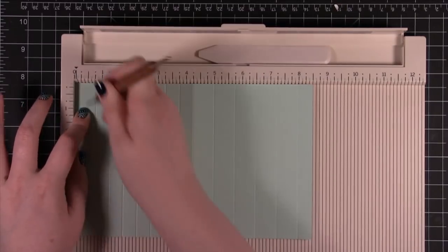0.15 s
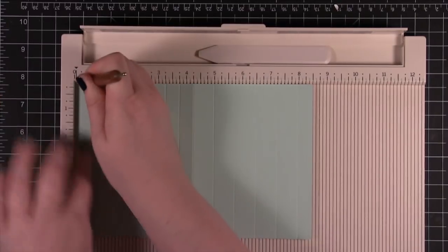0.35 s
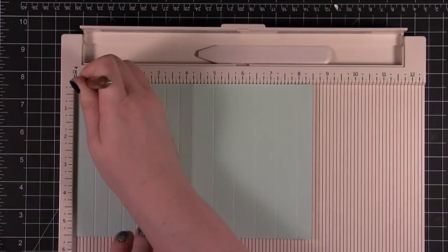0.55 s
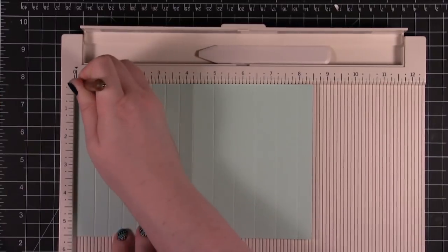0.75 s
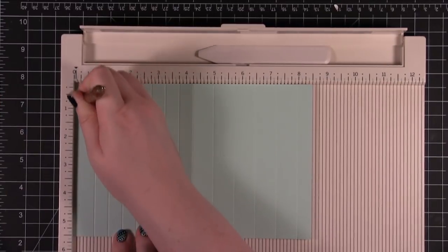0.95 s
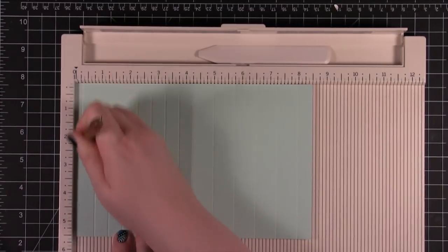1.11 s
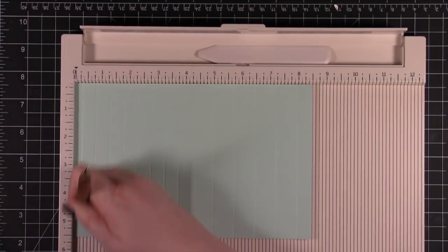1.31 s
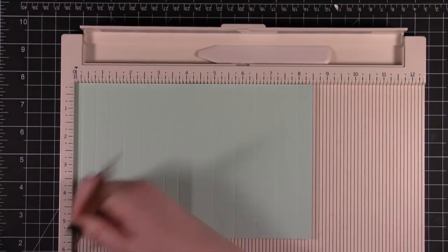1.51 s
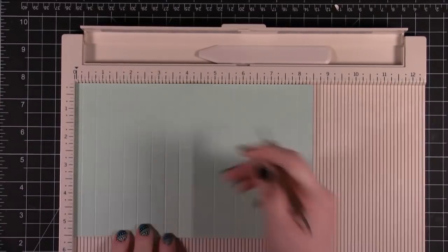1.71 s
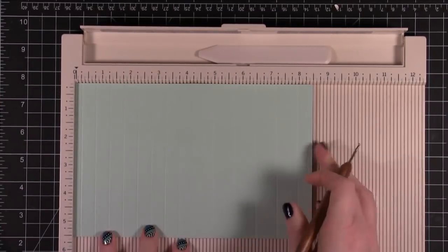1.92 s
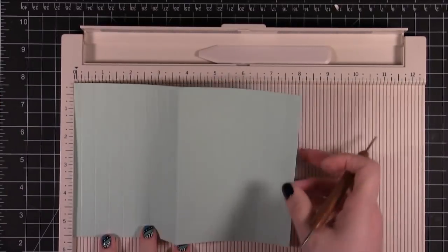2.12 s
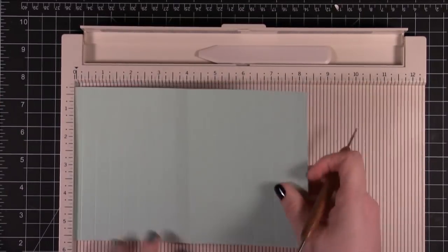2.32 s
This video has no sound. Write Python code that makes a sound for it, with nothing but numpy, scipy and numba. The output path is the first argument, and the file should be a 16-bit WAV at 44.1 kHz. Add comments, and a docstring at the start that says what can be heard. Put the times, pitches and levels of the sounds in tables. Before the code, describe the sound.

Stylus scoring card with a short rasp, ending in a sharp plastic click.

```python
"""A stylus scores cardstock on a plastic scoring board, at a desk in a small room.
Drawn down a groove, the tip crushes fibres (hiss) and stick-slips (rasp), then knocks on the board.
Before the stroke a hand slides over the sheet; after it fingers brush and lift the card,
which buckles with two dull pops. Ventilation noise and faint mains hum lie underneath."""
import sys
import numpy as np
from scipy import signal
from scipy.fft import rfft, irfft, next_fast_len
from scipy.io import wavfile
from numba import njit

SR = 44100
rng = np.random.default_rng(int(sys.argv[2]) if len(sys.argv) > 2 else 0)


def generate_wav(signal):
    """Clip the signal to [-1, 1] and save it as 16-bit WAV at the path in sys.argv[1]."""
    frames = np.transpose(np.atleast_2d(signal))
    scaled = np.clip(frames, -1, 1) * 32767
    pcm = np.round(scaled).astype(np.int16)
    wavfile.write(sys.argv[1], SR, pcm)


N = 103811
T = np.arange(N) / SR


def stylus():
    """The tip crushes fibres; its stick-slip shakes the board, whose drone grows towards the edge."""
    # stroke envelopes: time_s, hiss_db, rasp_db, drone_db
    stroke = [(.88, -84, -90, -80), (.95, -59, -56, -76), (1.03, -50, -66.5, -66),
              (1.11, -45.5, -50.5, -54), (1.18, -40.5, -44, -55.5), (1.25, -41, -36, -52.5),
              (1.32, -39, -32, -52), (1.35, -43, -35, -38), (1.385, -38.5, -41, -39.5),
              (1.418, -42.5, -40.5, -51), (1.43, -57, -54, -62)]
    # fibre and groove spectra: freq_hz, level_db
    fibre_colour = [(300, 0), (1500, -2), (3300, 0.5), (5000, -0.5), (7500, 0), (12000, -5), (16000, -13.5)]
    groove_colour = [(60, -22), (170, -8.5), (280, -10), (350, -4), (520, 2.5), (800, -1.5), (1300, -5.5),
                     (1800, -10), (2600, -21), (6000, -27)]
    # board resonances under the tip: centre_hz, relative_width, level_db
    groove_peaks = [(362, 0.17, -13.5), (469, 0.11, -6), (1002.6, 0.033, -6.5), (1748, 0.023, -15.5)]
    sag_from_s, sag_per_s = 1.3, 0.56
    drone_hz, waver, flutter_db = 232.4, 0.024, 4.5
    hiss = unit(colour(grains(per_s=13000, spread_db=0), fibre_colour))
    slips = grains(per_s=5000, spread_db=3)
    sag = 1 - sag_per_s * np.clip(T - sag_from_s, 0, .5)  # resonances fall near the edge
    peaks = sum(amp(db) * unit(band(slips, hz * sag, width)) for hz, width, db in groove_peaks)
    rasp = unit(unit(colour(slips, groove_colour)) + peaks)
    pitch_hz = drone_hz * (1 + waver * wander(rate_hz=33))
    flutter = amp(flutter_db * wander(rate_hz=25))
    drone = unit(np.sin(2 * np.pi * np.cumsum(pitch_hz) / SR) * flutter)
    return hiss * curve(stroke, 1) + rasp * curve(stroke, 2) + drone * curve(stroke, 3)


def knocks(size=16000):
    """The stylus runs off the card and hits the board: crack, ringing plastic, short rattle."""
    # impacts: start_s, level_db
    hits = [(1.4243, 0.5), (1.4438, -22)]
    # board modes: freq_hz, level_db, t60_s
    board_modes = [(133.5, -35.5, 0.23), (232.6, -27.5, 0.157), (320, -29.5, 0.14), (400, -17, 0.1),
                   (485, -12.5, 0.074), (574, -15.5, 0.072), (763, -11, 0.058), (940, -20, 0.067),
                   (1268, -20, 0.11), (1463, -31.5, 0.13), (1765, -31, 0.1), (2074, -23, 0.062),
                   (2234, -20.5, 0.06), (2540, -30, .1)]
    # crack and rattle spectra: freq_hz, level_db
    crack_colour = [(100, -27), (260, -24), (420, -13), (900, 3), (1600, 3), (3000, 0.5), (4600, 0.5),
                    (6000, -9.5), (9500, -11.5), (11000, -21), (12700, -13.5), (16000, -25)]
    rattle_colour = [(40, -7), (170, -23), (270, -8), (340, 6.5), (750, 3.5), (1100, -2), (2600, -9),
                     (4600, -3), (6200, -13), (10000, -18.5), (16000, -26)]
    rise_s = 0.00055
    attack = 1 - np.exp(-T[:size] / rise_s)
    plastic = ring(board_modes, push_s=.00008, size=size, radiate_hz=153)
    out = np.zeros(N)
    for start_s, db in hits:
        crack = amp(-14) * burst(crack_colour, size, t60_s=0.039) * attack
        rattle = amp(-19.5) * burst(rattle_colour, size, t60_s=0.21)
        add(out, start_s, amp(db) * (plastic + crack + rattle))
    return out


def hand():
    """Skin slides on paper: hiss shaped by the gap under the hand, plus a soft board rustle."""
    # slide envelope and gap resonance: time_s, level_db, gap_hz
    slide = [(0, -40.5, 3730), (.05, -40.5, 3580), (.12, -40, 3670), (.22, -39.5, 3340), (.28, -42.5, 3050),
             (.325, -49, 3550), (.355, -44.5, 4160), (.42, -46, 4460), (.445, -49.5, 4550),
             (.465, -63, 4800), (.48, -56, 5200), (.495, -46.5, 5700), (.565, -47.5, 5700),
             (.62, -63, 5400), (.7, -70, 5330)]
    # skin friction and board rustle spectra: freq_hz, level_db
    skin_colour = [(300, -3), (1500, 6), (3500, -3.5), (6500, 1), (9000, 0.5), (12000, 0), (16000, -6)]
    rustle_colour = [(60, -8), (200, -9), (330, -5), (480, 6), (700, -5), (1200, -4), (2000, -9.5),
                     (3000, -34), (6000, -19)]
    times_s, _, resonances_hz = np.array(slide).T
    gap_hz = np.interp(T, times_s, resonances_hz)
    skin = noise(skin_colour)
    hiss = unit(highpass(skin, gap_hz, width=0.57))
    gap_ring = amp(-22) * unit(band(skin, gap_hz, width=0.14))
    rustle = amp(-11) * noise(rustle_colour)
    return (hiss + gap_ring + rustle) * curve(slide)


def fingers(size=4000):
    """Fingers, nails and tip touch the card: soft taps, ticks, a tiny squeak, short brushes."""
    # soft taps: start_s, level_db, push_s
    taps = [(.2235, -27, 0.001), (.2545, -32, 0.00035), (.2575, -33.5, 0.00097), (.261, -37.5, 0.00036),
            (.416, -27.5, 0.0015), (.428, -38.5, 0.00068), (1.677, -39.5, 0.00013), (1.989, -42, 0.00055),
            (2.02, -40, 0.00038), (2.149, -41, 0.00041), (2.256, -41, 0.00037)]
    # board modes damped by card and hand: freq_hz, level_db, t60_s
    damped_modes = [(374, -0.5, 0.021), (450, 0, 0.049), (540.7, 0.5, 0.11), (787, -3, 0.045),
                    (1020, -3, 0.048), (1304, -5.5, 0.06)]
    # nail and tip ticks: start_s, level_db, t60_s
    ticks = [(.2548, -35, 0.017), (1.7945, -34, 0.011), (2.0386, -33, 0.017), (2.2567, -32.5, 0.014)]
    # tick spectrum: freq_hz, level_db
    tick_colour = [(200, -14), (800, -2), (1600, 0), (3200, 5), (5500, 0), (9000, -10), (16000, -8)]
    # finger brushes: peak_s, half_length_s, level_db, centre_hz, relative_width, glide_oct_per_s
    brushes = [(.005, 0.016, -45.5, 900, 1.05, -8), (1.585, 0.013, -55.5, 5000, 1.9, 11),
               (1.806, 0.0097, -49.5, 7000, 2.4, -5), (1.876, .06, -57, 4000, 4.2, 3),
               (2.034, 0.036, -43, 1210, 2.35, 4), (2.036, 0.013, -41.5, 4240, 1.5, -3),
               (2.123, 0.026, -40.5, 6000, 0.99, 5), (2.148, 0.02, -41.5, 3070, 0.51, 0),
               (2.149, 0.023, -41, 1330, 0.87, -4), (2.2, .018, -36.5, 1210, 0.5, -3),
               (2.212, 0.05, -55.5, 5550, 1.3, 8), (2.262, .011, -38.5, 1610, 2.2, -5),
               (2.345, 0.049, -34, 1110, 2.8, 7)]
    out, friction = np.zeros(N), grains(per_s=9000, spread_db=3)
    for start_s, db, push_s in taps:
        add(out, start_s, amp(db) * ring(damped_modes, push_s, size, radiate_hz=223))
    for start_s, db, t60_s in ticks:
        add(out, start_s, amp(db) * burst(tick_colour, size, t60_s))
    for hz, width_hz, db in [(6050, 290, -52), (9740, 500, -50.5)]:
        squeak = unit(shape(friction, lambda f: np.exp(-((f - hz) / width_hz) ** 2)))
        out += amp(db) * swell(peak_s=1.69, half_s=0.0026) * squeak
    for peak_s, half_s, db, hz, width, glide in brushes:
        near = np.abs(T - peak_s) < 4 * half_s
        touch = swell(peak_s, half_s)[near]
        octaves = glide * np.clip(T[near] - peak_s, -2 * half_s, 2 * half_s)
        rub = touch * band(rng.permutation(friction[near]), hz * 2 ** octaves, width)
        out[near] += amp(db) * rub * np.sqrt(np.sum(touch ** 2) / np.sum(rub ** 2))
    return out


def sheet(size=8000):
    """The lifted card snaps through in quick steps, each ringing the sheet and crackling."""
    # buckling steps: start_s, ring_db, push_s, crackle_db
    pops = [(2.2735, -15, 0.00078, -34), (2.2793, -6, 0.00039, -28), (2.283, -11.5, 0.00032, -42),
            (2.2885, -14, 0.000084, -36.5), (2.301, -22, 0.00025, -34.5), (2.322, -19, 0.00011, -26.5),
            (2.327, -19.5, 0.00025, -43)]
    # sheet modes: freq_hz, level_db, t60_s
    sheet_modes = [(387.5, -11.5, 0.04), (527, -13.5, 0.078), (670, -13.5, 0.14), (817, -7.5, 0.038),
                   (982, -5, 0.069), (1198, 1, 0.058), (1286, -0.5, 0.027), (1457, 0.5, 0.022),
                   (1750, -11, 0.047), (2000, -10, 0.027), (2640, -15.5, 0.048)]
    # crackle spectrum: freq_hz, level_db
    crackle_colour = [(60, -18), (250, -3), (1000, 7.5), (2500, 1), (5000, -3), (8500, -5.5), (12000, -14),
                      (16000, -22)]
    out = np.zeros(N)
    for start_s, ring_db, push_s, crackle_db in pops:
        pop = amp(ring_db) * ring(sheet_modes, push_s, size, radiate_hz=410)
        crackle = amp(crackle_db) * burst(crackle_colour, size, t60_s=0.053)
        add(out, start_s, pop + crackle)
    return out


def room(x, size=22000):
    """Adds desk reflections and a short room tail, wider in the treble."""
    # reflection spectra (all, side only, early mid only): freq_hz, gain_db
    room_colour = [(60, -1), (200, 4), (500, -0.5), (1500, 4.5), (4500, -4), (8000, -5), (16000, -15)]
    side_colour = [(100, 0), (400, -6.5), (1100, -7.5), (2500, -1.5), (6000, 2.5), (14000, -2)]
    early_mid_colour = [(200, -7.5), (800, -7.5), (2000, -0.5), (6000, 0)]

    def echoes(db, t60_s, build_s):
        """Scatter that builds up and decays, as mid and side."""
        build = 1 - np.exp(-(T[:size] / build_s) ** 2)
        tail = rng.standard_normal((2, size)) * fade(t60_s, size) * build
        return colour(amp(db) * tail / np.sqrt(np.sum(tail ** 2) / 2), room_colour)

    early = echoes(db=-4.5, t60_s=0.028, build_s=0.0029)
    late = echoes(db=-11, t60_s=0.4, build_s=0.0095)
    mid = colour(early[0], early_mid_colour) + late[0]
    side = colour(early[1] + late[1], side_colour)
    response = np.array([mid + side, mid - side]) / np.sqrt(2)
    return x + signal.fftconvolve(x, response[:, :size - 1000], axes=1)[:, :N]


def air():
    """Steady ventilation noise and faint mains hum."""
    # ventilation spectrum: freq_hz, level_db
    vent_colour = [(20, -30), (55, 0), (85, -7), (120, 2), (170, -5), (300, -4), (450, 2), (650, -4.5),
                   (1100, -7), (2000, -10), (4500, -15.5), (10000, -20.5), (16000, -28)]
    hum_hz = 119.8
    side = 0.66 * noise(vent_colour)
    mid = noise(vent_colour)
    hum = np.sqrt(2) * np.sin(2 * np.pi * hum_hz * T)
    return amp(-53) * np.array([mid + side, mid - side]) + amp(-67) * hum


def ring(modes, push_s, size, radiate_hz):
    """Modes of alternating sign struck by a push (longer is duller); a plate radiates little bass."""
    impulse = sum((-1) ** k * amp(db) * np.sin(2 * np.pi * hz * T[:size]) * fade(t60_s, size)
                  for k, (hz, db, t60_s) in enumerate(modes))
    push = T[:size] * np.exp(-np.pi * T[:size] / push_s)
    struck = signal.fftconvolve(impulse, push / push.sum())[:size]
    return low_cut(struck, radiate_hz)


def grains(per_s, spread_db):
    """Tiny slips at random times, of uneven size."""
    fires = rng.random(N) < per_s / SR
    return fires * rng.standard_normal(N) * amp(spread_db * rng.standard_normal(N))


def noise(points, size=N):
    """Coloured noise of rms 1."""
    return unit(colour(rng.standard_normal(size), points))


def burst(points, size, t60_s):
    """Decaying coloured noise."""
    return noise(points, size) * fade(t60_s, size)


def wander(rate_hz):
    """Random drift of rms 1."""
    return unit(shape(rng.standard_normal(N), lambda f: np.exp(-(f / rate_hz) ** 2)))


def curve(rows, column=1):
    """Gain along a dB column; opens 30 ms before the first row, silent after the last."""
    rows = np.array(rows)
    db = np.interp(T, rows[:, 0], rows[:, column], right=-120)
    return amp(db) * (T >= rows[0, 0] - .03)


def fade(t60_s, size):
    """Exponential decay."""
    return np.exp(-np.log(1000) * T[:size] / t60_s)


def swell(peak_s, half_s):
    """Gaussian rise and fall."""
    return np.exp(-((T - peak_s) / half_s) ** 2 / 2)


def shape(x, gain_at):
    """Filter by a gain function of frequency."""
    size = next_fast_len(x.shape[-1], real=True)
    hz = np.fft.rfftfreq(size, 1 / SR) + 1
    return irfft(rfft(x, size) * gain_at(hz), size)[..., :x.shape[-1]]


def colour(x, points):
    """Filter by (freq_hz, gain_db) points."""
    hz, db = np.array(points).T
    return shape(x, lambda f: amp(np.interp(np.log(f), np.log(hz), db)))


@njit
def svf(x, hz, width):
    """State-variable filter, moving centre, relative width: band-pass and high-pass outputs."""
    y, band_state, low_state = np.empty((2, len(x))), 0., 0.
    for i in range(len(x)):
        g = np.tan(np.pi * hz[i] / SR)
        mid = (band_state + g * (x[i] + 1e-18 - low_state)) / (1 + g * (g + width))
        low = low_state + g * mid
        band_state, low_state = 2 * mid - band_state, 2 * low - low_state
        y[0, i], y[1, i] = width * mid, x[i] - width * mid - low
    return y


def highpass(x, hz, width):
    """Resonant high-pass with a moving corner."""
    return svf(x, hz, width)[1]


def band(x, hz, width):
    """Steep band-pass: the resonance applied twice."""
    hz = np.clip(hz + np.zeros(len(x)), 20, 15000)
    once = svf(x, hz, float(width))[0]
    return svf(once, hz, float(width))[0]


def low_cut(x, hz):
    """Second-order bass roll-off."""
    return signal.sosfilt(signal.butter(2, hz, "high", fs=SR, output="sos"), x)


def amp(db):
    """Decibels to gain."""
    return 10 ** (np.asarray(db) / 20)


def unit(x):
    """Scale to rms 1."""
    return x / np.sqrt(np.mean(x ** 2))


def add(out, start_s, x):
    """Mix x into out."""
    i = max(int(start_s * SR), 0)
    out[i:i + len(x)] += x[:max(N - i, 0)]


def pan(x, db):
    """Stereo tilt, left minus right."""
    return x * amp(np.array([[db], [-db]]) / 2)


def scene():
    """All action on the desk, slightly to the right."""
    desk = pan(hand() + stylus(), db=-1) + pan(knocks(), db=-1.5) + pan(fingers() + sheet(), db=-0.8)
    return room(desk) + pan(air(), db=-1.5)


def record(dry):
    """Cuts the deepest bass and the top treble."""
    top_hz = 15750
    top_cut = signal.ellip(10, .2, 80, top_hz, fs=SR, output="sos")
    return signal.sosfilt(top_cut, low_cut(dry, hz=37))


dry = scene()
out = record(dry)
generate_wav(out)
```